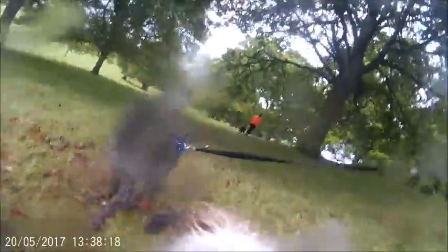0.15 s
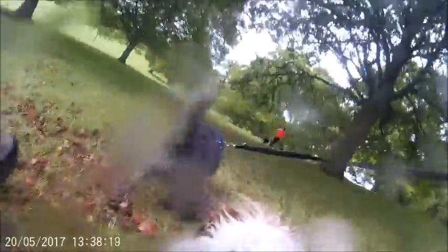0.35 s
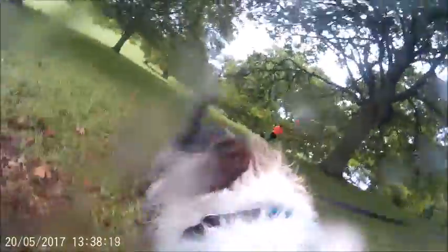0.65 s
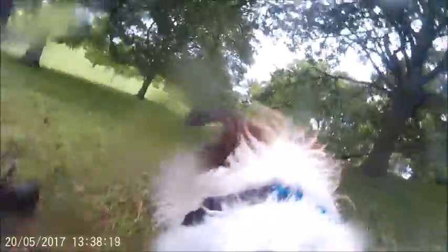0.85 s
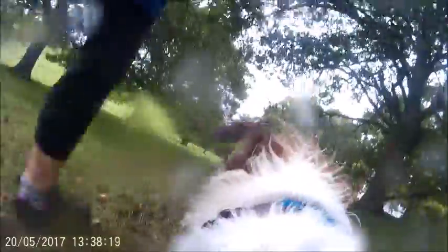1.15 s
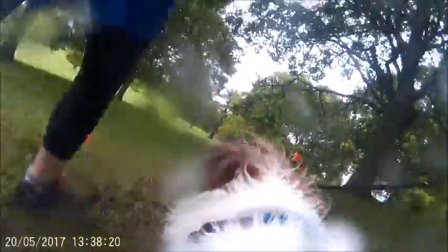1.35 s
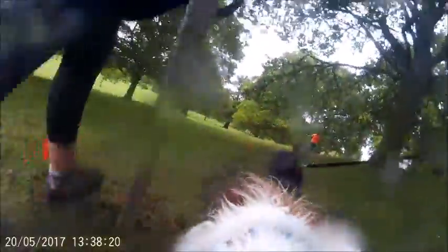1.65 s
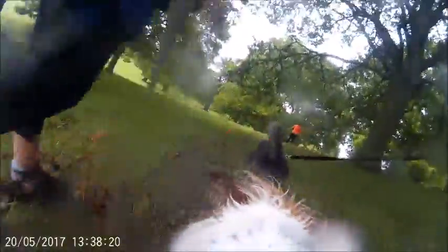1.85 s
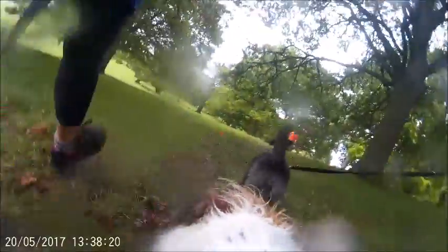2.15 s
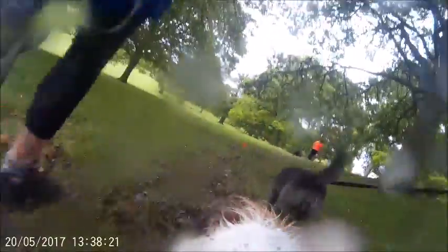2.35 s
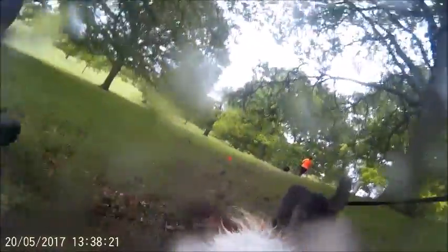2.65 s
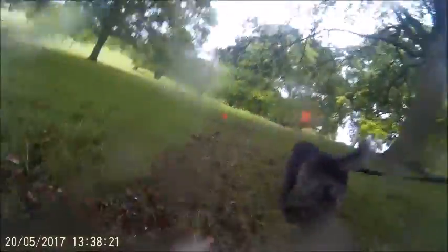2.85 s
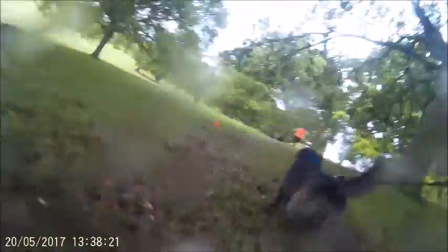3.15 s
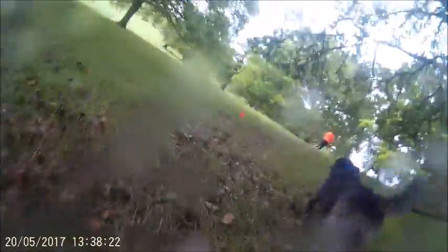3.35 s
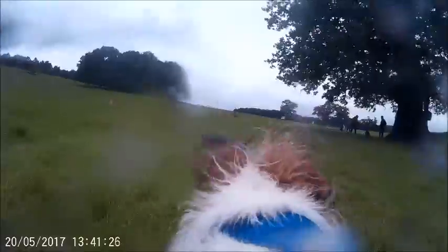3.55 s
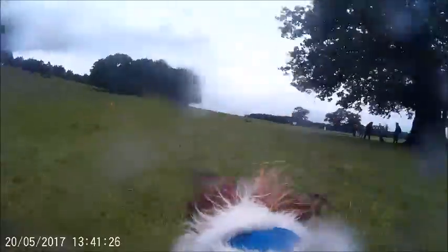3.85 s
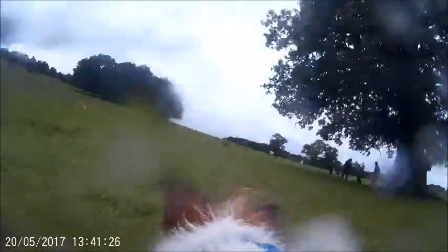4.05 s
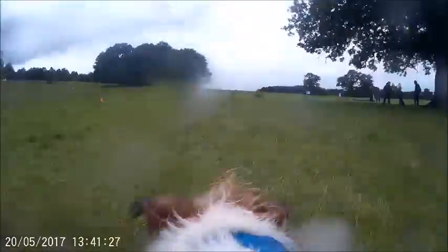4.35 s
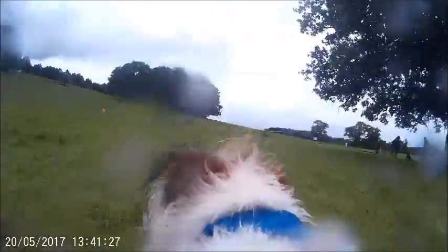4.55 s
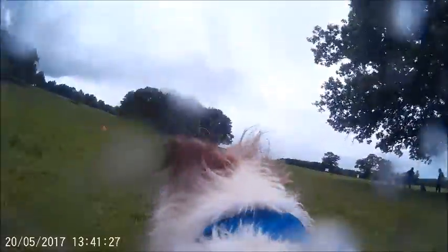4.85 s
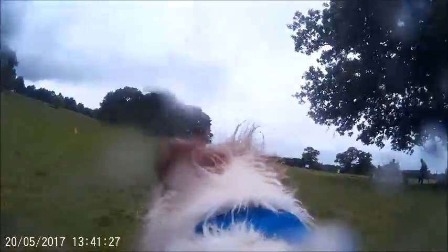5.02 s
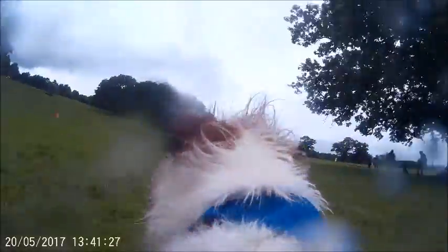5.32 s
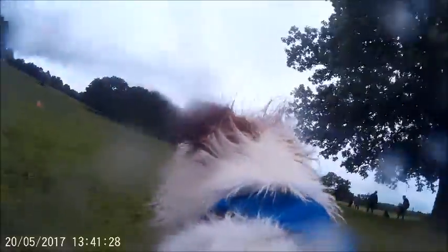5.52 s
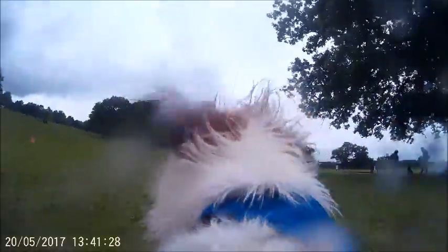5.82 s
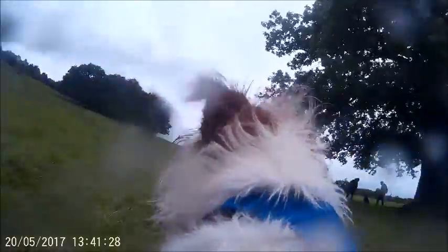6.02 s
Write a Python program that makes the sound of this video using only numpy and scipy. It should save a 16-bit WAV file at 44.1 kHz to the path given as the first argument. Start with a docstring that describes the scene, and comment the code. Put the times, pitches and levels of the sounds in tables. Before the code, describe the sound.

Dull, very close thumps run throughout, several a second and slightly uneven, as a dog runs over grass with a camera on its harness. The microphone is sealed inside the plastic housing, so buckle knocks and short gritty rubs of straps and fur sound hollow and boxy. Low wind rumble swells with each bound, over a faint electronic hiss.

Two clear knocks come at about 0.4 and 0.5 seconds, then a heavy, deep thud with a knock at 0.8, followed by brief scrapes. Lighter clicks and jolts continue until a sharp, loud knock at 3 seconds starts a cluster of scraping and rattling, with another knock near 3.4. The sound cuts out for an instant at about 3.6 seconds. The thumps, small clacks and wind return at once, with a firmer knock near 4.7, and ease off towards 6 seconds.

```python
"""Dull thumps and knocks, very close: a dog running over grass, heard from a camera on its harness.
Each stride jolts the mount, buckles knock and straps rub on the sealed plastic housing, and wind
buffets it with every bound. The microphone sits shut inside, so the contacts take on the shell's
resonances, over a faint electronic hiss. The sound cuts out once for an instant."""
import sys
import numpy as np
from scipy import signal
from scipy.io import wavfile
from scipy.ndimage import uniform_filter1d

SR = 44100
rng = np.random.default_rng(int(sys.argv[2]) if len(sys.argv) > 2 else 0)


def store_pcm(level_fs):
    """Save levels as 16-bit WAV."""
    pcm = np.round(np.clip(level_fs, -1, 1) * 32767).astype(np.int16)
    wavfile.write(sys.argv[1], SR, np.atleast_2d(pcm).T)


N = 272532

# Stride jolts, right at the camera mount.
# Each row: centre in seconds, peak level in dB, pitch in Hz, half length in ms.
JOLTS = [(.044, -35, 105, 5.1), (0.202, -21, 158, 4.9), (.222, -33, 123, 2.7), (0.379, -32, 169, 0.97),
         (.492, -31, 213, 3.7), (0.581, -24.5, 153, 4.2), (0.606, -32, 178, 1.4), (0.631, -31, 160, 1.4),
         (0.895, -36, 245, 8.2), (0.969, -20.5, 116, 2.5), (1.23, -24.5, 133, 2.2), (1.394, -32, 130, 6.5),
         (1.569, -36, 100, 3.8), (1.591, -28, 163, 3.4), (1.783, -24, 140, 2), (2.162, -23, 129, 2.45),
         (2.268, -32.5, 141, 1.9), (2.367, -34.5, 91, 3.2), (2.507, -24.5, 115, 0.84),
         (2.533, -22.5, 113, 1.9), (2.706, -36, 159, 3.5), (2.828, -39, 129, 4.5), (2.856, -18.5, 190, 5.3),
         (2.937, -32, 140, 1.4), (3.012, -34.5, 225, 6.1), (3.04, -29.5, 99, 3), (3.187, -21.5, 157, 2.4),
         (3.321, -31.5, 87, 4.6), (3.366, -35.5, 136, 7), (3.389, -33, 172, 3.1), (3.517, -24, 192, 1.8),
         (3.585, -23.5, 162, 1.8), (3.726, -27.5, 148, 0.85), (3.747, -31.5, 132, 4.1),
         (3.809, -23, 135, 2.1), (3.822, -24.5, 114, 2), (3.849, -31, 116, 8), (3.874, -26, 180, 1.14),
         (4.007, -27, 122, 3.7), (4.189, -31.5, 152, 2.1), (4.231, -36, 140, 3.7), (4.317, -25, 109, 2.1),
         (4.343, -25.5, 116, 0.77), (4.544, -33.5, 112, 2.4), (4.561, -21, 126, 1.2),
         (4.725, -22.5, 136, 1.8), (4.747, -33, 154, 1.9), (4.778, -33, 148, 1.4), (4.908, -29.5, 172, 2.7),
         (5.002, -28, 167, 0.88), (5.106, -26, 95, 2.7), (5.344, -23.5, 160, 1.05),
         (5.493, -37.5, 104, 4.9), (5.52, -25, 142, 1.55), (5.706, -35, 120, 5.8), (5.728, -30, 135, 0.91),
         (6.044, -39.5, 256, 9.4)]
def thumps():
    """Each jolt swings the mount briefly, sagging in pitch and fading a little slower than it rose."""
    out, t = np.zeros(N + 8192), np.arange(-2048, 2048) / SR
    for (s, db, hz, ms), phase in zip(JOLTS, rng.random(len(JOLTS))):
        half = ms / 1000
        envelope = np.exp(-.5 * (t / (half * np.where(t < 0, .85, 1.2))) ** 2)
        sag = 1 - 0.07 * np.tanh(t / half)
        swing = np.cos(2 * np.pi * (hz * t * sag + phase))
        i = int(s * SR)
        out[i:i + 4096] += undb(db) * envelope * swing
    return out[2048:N + 2048]


# Low modes of the mount. Each row: pitch in Hz, time to fall 60 dB in seconds, level in dB.
MOUNT_MODES = [(77, 0.035, -13), (175, 0.023, -9.5)]
def heavy_blow(start_s=.8035):
    """One hard blow sets the whole mount ringing low."""
    t = np.maximum(np.arange(N) / SR - start_s, 0)
    return sum(undb(db) * np.exp(-np.log(1000) * t / t60) * np.sin(2 * np.pi * hz * t)
               for hz, t60, db in MOUNT_MODES)


# Buckles striking the shell, centimetres from the microphone. Each row: start in seconds,
# level of the body modes in dB, then the hollow and the bright modes in dB relative to that.
BUCKLE_HITS = [(0.098, -48, -25, -4.5), (.126, -40.5, -13, -21), (.376, -21, -10, -51),
               (0.463, -38, -4, -41), (0.476, -39, -7, -37), (0.486, -15, -15, -28), (.584, -39, -4.5, -34),
               (0.738, -39, -5, -43), (.803, -11.5, 1, -21), (.827, -44, -32, -20), (.9, -38, -26, -3.5),
               (.967, -37.5, -15, -52), (1.229, -34.5, 0.5, -4.5), (1.292, -28.5, -13, -52),
               (1.353, -39.5, 2, -43), (1.625, -38, -5, 1.8), (2.266, -45, -3, -49),
               (2.363, -44.5, -7, -31), (2.398, -40, -7.5, -1.5), (2.729, -39, -5, -1.5),
               (2.819, -46.5, 13, -34), (2.845, -27.5, -0.5, -11.5), (2.978, -38, 0, -36),
               (3.004, -8.5, -40, -30), (3.0315, -20.5, -35, -33), (3.088, -32, -3.5, -21),
               (3.093, -34, -28, 1.5), (3.168, -35.5, -5, -3.5), (3.387, -21.5, -42, -25.5),
               (3.419, -29, -14, -1.5), (3.583, -36.5, -6, -21), (3.697, -41, 0.5, -20),
               (3.807, -40.5, 3.5, 2.2), (3.892, -37.5, -4, -18), (4.16, -43.5, -22, 1.5),
               (4.214, -42, -26, -20), (4.554, -33.5, -1, -18.5), (4.722, -42, -5, -31),
               (4.752, -28, 6.5, -15.5), (4.905, -39, 4, -21), (4.942, -43, -7, -0.5),
               (5.164, -51.5, -7, -1.5), (5.319, -37, -3.5, -14.5), (5.347, -48.5, -7, -2),
               (5.517, -40, -0.5, -19), (5.581, -50, -3, -3.5), (5.706, -48, -2, -28),
               (5.756, -57.5, -10.1, 4)]
def knocks(rattle_db=-30, rattle_t60_s=0.039):
    """A sharp hit, a quick rebound and a dying rattle ring the shell; hard parts chatter for a few ms."""
    drive, t = np.zeros((4, N + 8192)), np.arange(8192) / SR
    rattle, chatter = (np.append(slips(rate, 0.79), np.zeros(8192)) for rate in (900, 6000))
    chance = rng.random((len(BUCKLE_HITS), 2))
    for (s, db, hollow_db, bright_db), (lag, rebound) in zip(BUCKLE_HITS, chance):
        i = int((s + .0006) * SR)
        span = slice(i, i + 8192)
        hit = undb(rattle_db) * rattle[span] * np.exp(-np.log(1000) * t / rattle_t60_s)
        hit[0] += 1
        hit[int(SR * .0025 * (.6 + lag))] += 0.11 * rebound
        group_db = np.array([[hollow_db], [0], [upper_db(bright_db)], [bright_db]])
        drive[:, span] += undb(db + group_db) * hit
        drive[2:, span] += undb(db + bright_db) * 0.11 * chatter[span] * np.exp(-(t / 0.0033) ** 2)
    return sum(ring_shell(x, modes) for x, modes in zip(drive, (HOLLOW, BODY, UPPER, BRIGHT)))


# Modes of the plastic shell around the microphone. Each row: pitch in Hz, width in Hz, relative dB.
SHELL_MODES = [(410.3, 126, 0.5), (610, 65, -19), (764, 142, -8), (907, 174, -3), (1100, 155, -1.5),
               (1370, 129, -3), (1745, 283, -2), (2028, 510, -9), (2990, 750, 9.5), (3753, 280, -19.5),
               (3663, 206, 0.5), (4640, 2500, -8.5), (5180, 4100, -11), (7900, 1300, -16.5),
               (10300, 1000, -4)]
HOLLOW, BODY, UPPER, BRIGHT = ([mode for mode in SHELL_MODES if lo < mode[0] < hi]
                               for lo, hi in ((0, 700), (700, 1500), (1500, 2500), (2500, 20000)))
def ring_shell(drive, modes):
    """The shell rings in damped modes of alternating sign; a unit click gives a peak of 1."""
    t = np.arange(2048) / SR
    top_hz = modes[-1][0]
    ring = sum((-1) ** k * undb(db) * np.exp(-np.pi * width * t) * np.sin(2 * np.pi * hz * t)
               for k, (hz, width, db) in enumerate(modes))
    ring *= 1 - np.exp(-(t * top_hz / 0.43) ** 2)  # the swing builds up over part of a cycle
    ring = signal.sosfilt(signal.butter(4, 1.02 * top_hz, fs=SR, output="sos"), ring)
    return signal.fftconvolve(drive, ring / np.abs(ring).max())[:N]


def upper_db(bright_db):
    """A harder contact that wakes the bright modes also favours the upper ones."""
    return -3.5 + 0.43 * (bright_db + 21.0)


# Fur and webbing brushing right against the housing. Each row: time in seconds, relative level in dB.
BRUSHING = [(0, -55), (.46, -60.5), (.8, -53), (1.7, -58.5), (2.8, -57.5), (3.55, -56.5), (3.7, -60.5),
            (4.7, -59), (5.9, -59.5), (6.18, -65.5)]
# Straps dragging across it. Each row: start in seconds, length in ms, relative level in dB,
# offset for the bright modes in dB.
STRAP_DRAGS = [(.392, 27, -41, -33), (.435, 43, -43, -48), (.62, 110, -60, -26), (.812, 98, -44.5, -7),
               (0.953, 23.5, -31.5, -42), (1.003, 51, -39, -36), (1.138, 29, -50, -53),
               (1.198, 21, -37, -58), (1.277, 38, -37, -33), (1.345, 30, -48, -39), (1.574, 40, -42, -26),
               (1.934, 19, -34, -45), (2.029, 41.7, -34, -29), (2.092, 35, -51, -54), (2.41, 21, -61, -35),
               (2.548, 48, -56.5, -25), (2.836, 68, -52, -25), (2.92, 22, -48.5, -24),
               (3.015, 34, -22.5, -30.5), (3.05, 18, -35, -41), (3.099, 24, -54, -24),
               (3.137, 60.4, -32.5, -42), (3.21, 47, -58, -21), (3.378, 37, -30, -35),
               (3.501, 17.7, -34.5, -45), (3.543, 46, -44.5, -24), (3.653, 66, -58.5, -25),
               (3.802, 79, -51.5, -27), (4.2, 70, -55.5, -26), (4.29, 45, -57, -19),
               (4.546, 27, -48.5, -25), (4.66, 57, -66, -28), (4.74, 23, -40.5, -21), (4.905, 34, -46, -35),
               (5.14, 80, -59, -21), (5.278, 83, -54, -23), (5.49, 55, -59, -23), (5.6, 120, -65, -31),
               (5.87, 79, -64, -30), (5.99, 81, -57.5, -28)]
def rubbing(swell_db_per_db=0.18, pivot_db=-45.5, drag_fade_db=-3):
    """Stick-slip clicks ring the shell: faint brushing that swells with each bound, and firm drags."""
    t = np.arange(N) / SR
    swell_db = swell_db_per_db * (shaking()[0] - pivot_db)
    body = undb(curves(BRUSHING)[0] + swell_db + 0.27 * wander(30))
    upper, bright = body * undb(-5.5), body * undb(-19)
    for s, ms, db, bright_db in STRAP_DRAGS:
        progress = (t - s) * 1000 / ms
        inside_ms = np.minimum(progress, 1 - progress) * ms
        grip = np.clip(inside_ms / 25.0 + 0.58, 0, 1) ** 2  # the strap grips and lets go gradually
        drag = grip * undb(db + drag_fade_db * (np.clip(progress, 0, 1) - .5))
        body += drag
        upper += drag * undb(upper_db(bright_db))
        bright += drag * undb(bright_db)
    patchy = undb(0.86 * wander(200))
    # separate gritty clicks for the low and the high part of the rubbing
    low_grit, high_grit = slips(5000, 0.75) * patchy, slips(5000, 1.1) * patchy
    return (undb(-22.5) * ring_shell(low_grit * body, BODY)
            + undb(-20.5) * ring_shell(high_grit * upper, UPPER)
            + undb(-12.5) * ring_shell(high_grit * bright, BRIGHT)
            + undb(-31.5) * band(ring_shell(low_grit * body, HOLLOW), 360, 740))


def buffeting():
    """The mount sways at a wandering low pitch; gusts push the diaphragm and blow across the hollow."""
    rumble_db, flutter_db = shaking()
    gusts = slips(300, 0.86) * undb(0.66 * wander(40))
    sway_hz = 33 * 2 ** (0.34 * wander(30))
    sway = np.sin(2 * np.pi * np.cumsum(sway_hz) / SR)
    rumble = unit(sway + 0.44 * unit(band(rng.standard_normal(N), 13.6, 85.3)))
    soft_lumps = unit(band(band(gusts, 42, 245), 55, 310))
    hollow = unit(band(ring_shell(gusts + 1.4 * rng.standard_normal(N), HOLLOW), 317, 760))
    flutter = undb(-5.5) * hollow + undb(6.5) * soft_lumps
    return undb(rumble_db) * rumble + undb(flutter_db) * flutter


# The dog's bounds, felt at the harness. Each row: crest time in seconds, rumble level in dB,
# relative flutter level in dB, crest length in ms.
BOUNDS = [(0.0, -40, -47.5, 24), (0.204, -33.5, -54, 14), (.405, -39, -56, 16), (0.587, -35.5, -56, 16),
          (0.809, -31, -51, 5), (0.991, -40.5, -50, 54), (1.22, -39, -56, 35), (1.39, -34, -50, 10),
          (1.57, -40, -57.5, 20), (1.79, -35.5, -57, 5), (1.95, -44, -56.5, 69), (2.178, -34, -51, 9.1),
          (2.37, -45.5, -62, 110), (2.515, -33, -50, 9.9), (2.682, -40, -57, 13), (2.85, -31, -50, 23),
          (3.03, -41.5, -52.5, 60), (3.18, -32.5, -50, 13), (3.31, -44.5, -62, 7.3),
          (3.385, -37.5, -52, 22), (3.45, -36, -55, 27), (3.53, -36, -45, 7.6), (3.67, -39, -56.5, 51),
          (3.851, -35.5, -46, 38), (4.008, -38, -53, 9.2), (4.21, -39, -52.5, 45), (4.34, -38.5, -54, 20),
          (4.43, -45, -67, 7.5), (4.552, -39, -52, 21), (4.742, -35.5, -45, 14), (4.92, -38, -50, 26),
          (5.115, -36.5, -58, 17), (5.31, -38, -59, 34), (5.511, -42, -55, 78), (5.709, -41.5, -51.5, 28),
          (5.94, -46.5, -59, 85), (6.07, -52, -60.5, 40)]
def bound_swells(column, calm_db, rise_db_per_s, fall_db_per_s):
    """Level in dB as each bound shakes the mount and fans air over it: quick swell, crest, slower fall."""
    t = np.arange(0, N + 64, 64) / SR
    rows = np.array(BOUNDS)
    from_crest_s = t - rows[:, :1]
    outside_s = np.maximum(np.abs(from_crest_s) - rows[:, 3:] / 2000, 0)
    drop_db = outside_s * np.where(from_crest_s < 0, rise_db_per_s, fall_db_per_s)
    strongest = undb(rows[:, [column]] - drop_db).max(axis=0)
    gain = np.interp(np.arange(N) / SR, t, strongest)
    return 20 * np.log10(np.hypot(gain, undb(calm_db)))


# Wind on the housing between bounds, out on the grass.
# Each row: time in seconds, rumble level in dB, relative flutter level in dB.
CALM_WIND = [(0, -53, -66), (.9, -56, -56.5), (1.8, -50, -62), (2.7, -61, -58.5), (3.4, -57, -56),
             (4.1, -66, -67), (5.1, -52, -57.5), (5.8, -57, -62.5), (6.18, -56.5, -73)]
def shaking():
    """The bounds ride on the lasting wind; gives rumble and flutter levels in dB."""
    rumble_db, flutter_db = curves(CALM_WIND)
    return (bound_swells(1, rumble_db, rise_db_per_s=312, fall_db_per_s=231),
            bound_swells(2, flutter_db, rise_db_per_s=209, fall_db_per_s=162))


def slips(per_s, spread_db):
    """Random clicks of uneven size; rms 1."""
    size = undb(spread_db * rng.exponential(size=N)) * rng.standard_normal(N)
    return unit(size * (rng.random(N) < per_s / SR))


def wander(per_s):
    """Random steps smoothed twice into a drift; standard deviation about 2.7."""
    hold = int(SR / per_s)
    steps = np.repeat(rng.standard_normal(N // hold + 1), hold)
    return 3.7 * uniform_filter1d(uniform_filter1d(steps, hold), hold)[:N]


def undb(db):
    """Decibels to gain."""
    return 10 ** (np.asarray(db) / 20)


def unit(x):
    """Scale to rms 1."""
    return x / np.sqrt(np.mean(x ** 2))


def curves(table):
    """Columns of a timed table as sample-rate curves."""
    times, *columns = np.transpose(table)
    return [np.interp(np.arange(N) / SR, times, column) for column in columns]


def band(x, lo_hz, hi_hz):
    """Band-pass filter."""
    return signal.sosfilt(signal.butter(2, [lo_hz, hi_hz], "bandpass", fs=SR, output="sos"), x)


def scene():
    """Mount, shell and wind together at the one microphone inside the housing."""
    return (thumps() + heavy_blow() + knocks() + rubbing() + buffeting())[None]


def record(dry, hiss_db=-69.5, dropout_s=(3.5965, 3.629), top_hz=15050):
    """The microphone adds its own hiss; the sound drops out for an instant and the top treble is cut."""
    t = np.arange(N) / SR
    hiss = undb(hiss_db) * rng.standard_normal(N)
    gate = np.clip(np.maximum(dropout_s[0] - t, t - dropout_s[1]) / .001, .003, 1)
    lowpass = signal.ellip(8, .2, 70, top_hz, fs=SR, output="sos")
    return signal.sosfilt(lowpass, (dry + hiss) * gate)


dry = scene()
out = record(dry)
store_pcm(out)
```